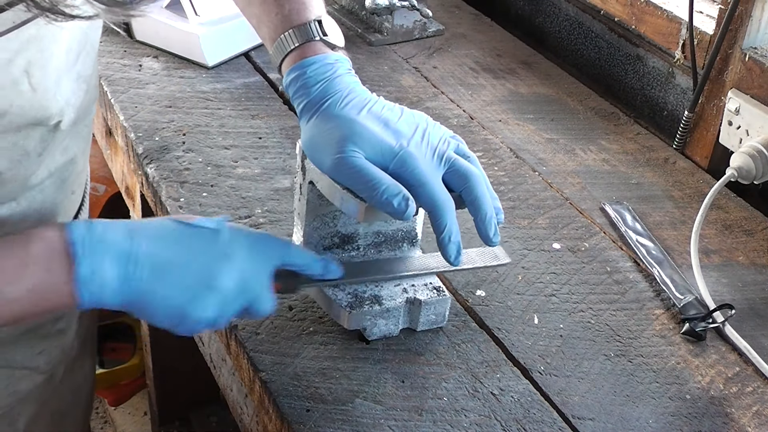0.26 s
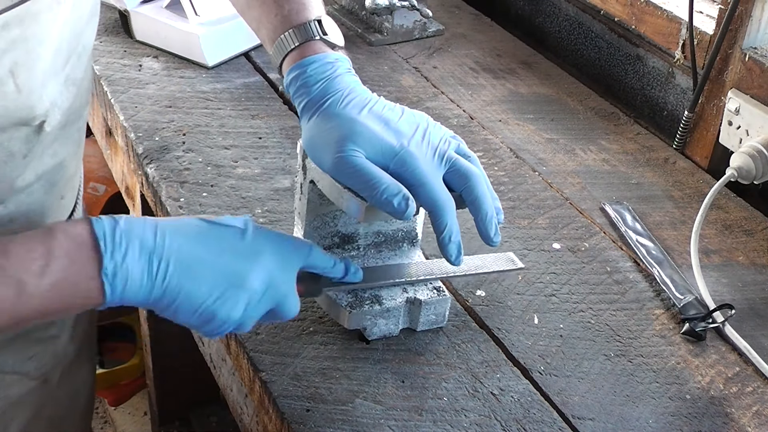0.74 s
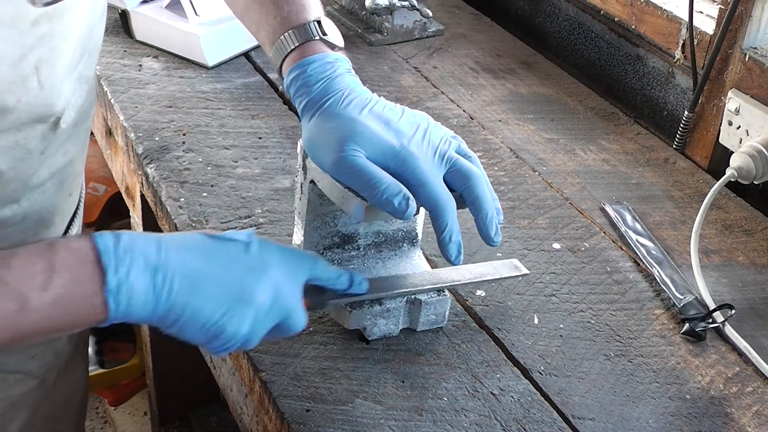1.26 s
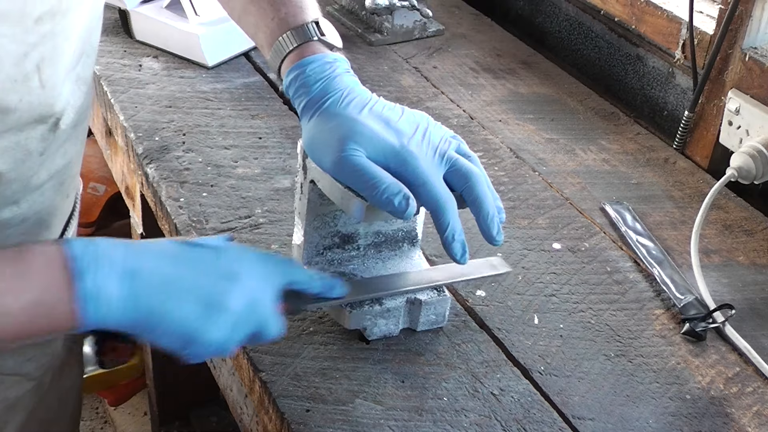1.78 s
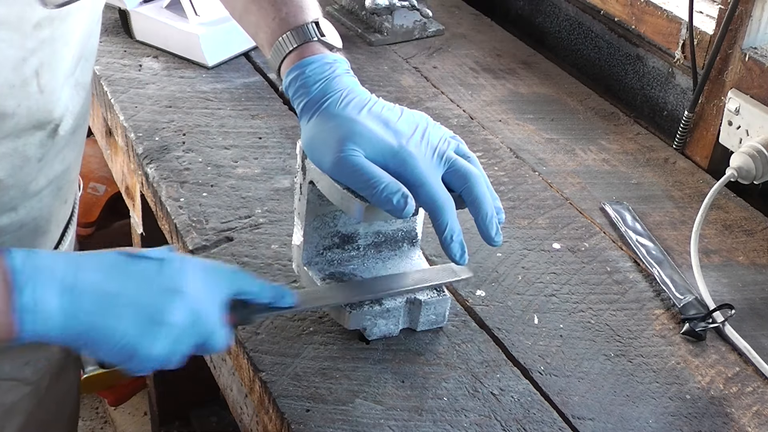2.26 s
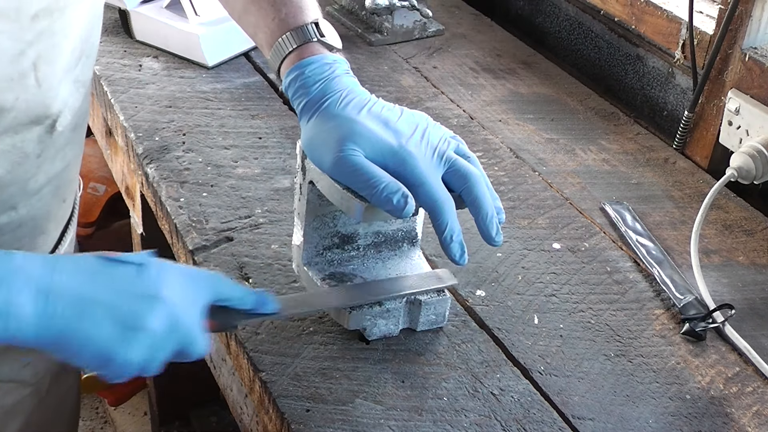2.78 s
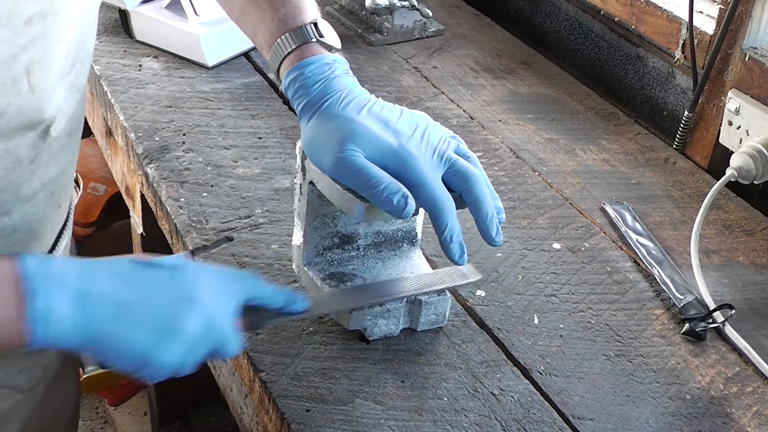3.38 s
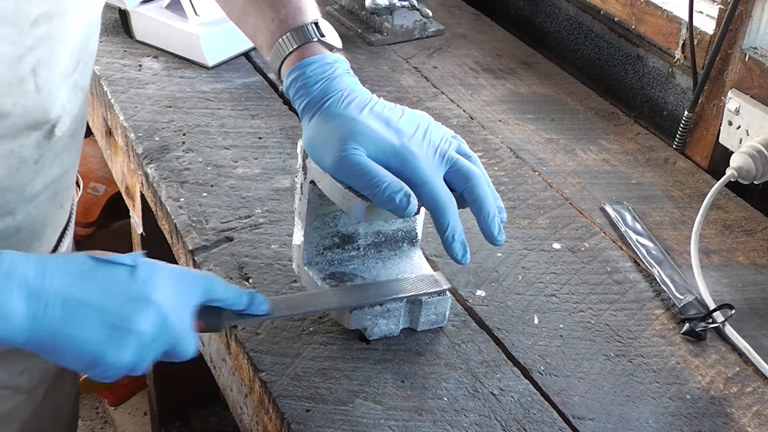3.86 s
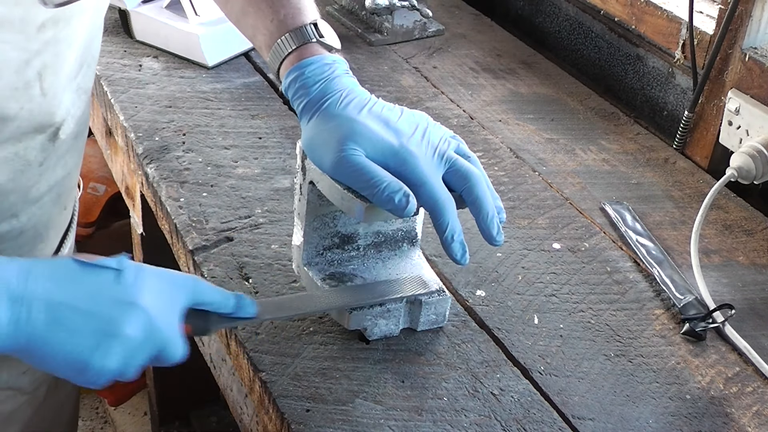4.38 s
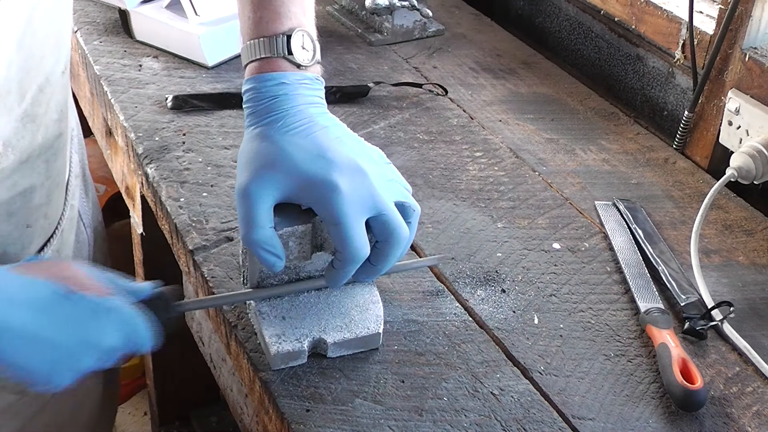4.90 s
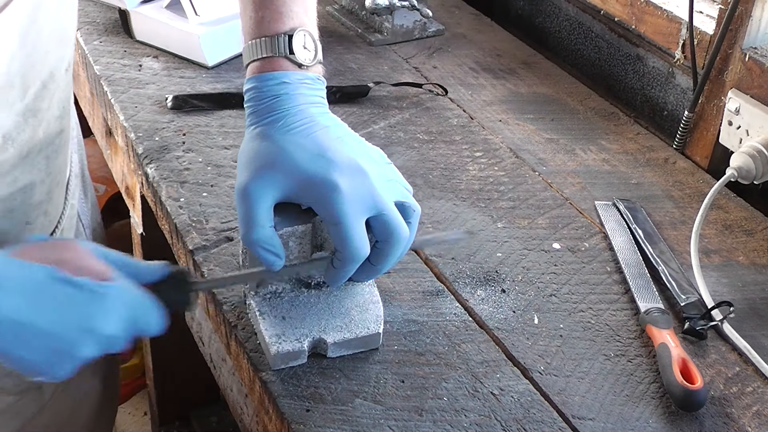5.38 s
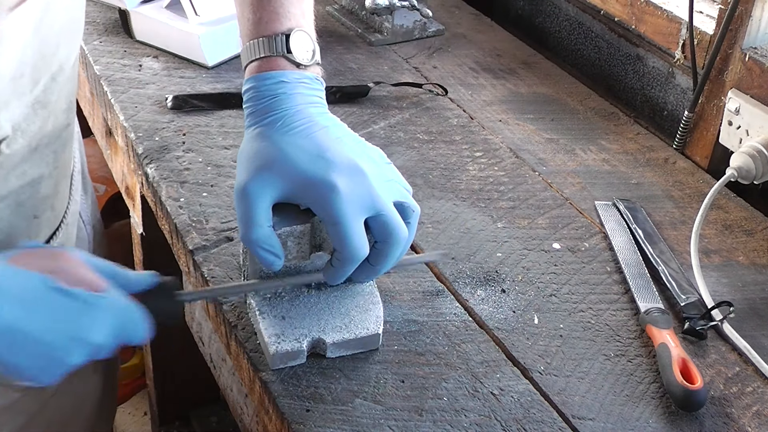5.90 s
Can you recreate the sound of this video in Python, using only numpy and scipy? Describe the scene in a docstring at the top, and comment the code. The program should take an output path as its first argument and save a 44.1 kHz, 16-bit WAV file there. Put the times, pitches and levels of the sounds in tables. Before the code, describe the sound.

Nine gritty strokes of a flat file on cast metal, then three with a slimmer file, rattling a wooden bench in a quiet workshop.

```python
"""Hand filing at a workbench

A hand file rasps over a metal casting on a wooden bench: nine strokes of a flat file, then three of a slimmer one.
Random tooth catches drive filters for the hissing steel, the chattering blade and the drumming bench.
Most strokes land with a click; light ticks, stick-slip squawks and brief singing come between and on top.
The workshop is small and quiet, with a low rumble and a hum under the slim file; the microphone is close."""
import sys
import numpy as np
from scipy import signal
from scipy.fft import rfft, irfft, next_fast_len
from scipy.io import wavfile
from scipy.ndimage import uniform_filter1d, map_coordinates

SR = 44100
rng = np.random.default_rng(int(sys.argv[2]) if len(sys.argv) > 2 else 0)


def to_wav(s):
    """Save 16-bit WAV."""
    ch = np.atleast_2d(s).T  # columns
    pcm = np.round(np.clip(ch, -1, 1) * 32767)  # PCM
    wavfile.write(sys.argv[1], SR, pcm.astype(np.int16))


N = 270774  # samples

# Levels in the tables are balances ahead of the mix trims set in scene().

# strokes: touch_s, bite_s (full bite), rise_s, hold_s, release_s (time to fall by LIGHT_DB), hiss_db,
# gained_db (effort gained over the hold), chatter_db and judder_db (blade and bench above the hiss),
# lean_db (judder gained over the hold), top_db (top of the hiss against the rest)
FLAT_STROKES = [ (0, 0.06, 0.065, 0.14, 0.092, -29, 5, 2.7, 5.5, -2.5, 5),
                (0.54, 0.69, 0.12, 0.083, 0.11, -33.5, -1, 2.9, -3.5, -15, 2),
                (1.064, 1.184, 0.051, 0.099, 0.098, -25.5, 1, 6, 5.5, 0, -4),
                (1.618, 1.747, 0.086, 0.14, 0.07, -23.5, -1.9, 4, -1, -9, 0.5),
                (2.141, 2.298, 0.098, 0.12, 0.093, -26, 3, 6.9, 4, -3.5, -2),
                (2.758, 2.838, 0.086, 0.13, 0.093, -25, -1.5, 4.5, -0.5, -2.5, 0),
                (3.234, 3.335, 0.031, 0.22, 0.082, -28.5, 2.6, 6.3, 4.5, -7.5, -3),
                (3.814, 3.955, 0.1, 0.13, 0.091, -23, -11.5, 3.3, -1, -4, -6),
                (4.367, 4.485, 0.1, .13, 0.072, -21.5, -10, 3.1, -3.5, -11.5, -0.5), ]
SLIM_STROKES = [ (4.856, 5.081, 0.054, 0.22, 0.088, -29.5, -7, 5.4, 6.6, 10.5, 0),
                (5.59, 5.705, 0.12, 0.093, 0.11, -29.5, -3, 5.9, 6.7, 5.9, 0),
                (6.048, 6.052, 0.0024, 0.04, 0.11, -31.5, -1, 3.3, 1.1, 2.7, 0), ]
# the file lands or snags: start_s, click_db, weight_db (how much more it shakes blade and bench)
FLAT_KNOCKS = [(0.5397, -5.5, -23.5), (1.064, -13, 4), (1.1707, -14.5, 3.5), (1.6182, -8.5, -12),
               (2.141, -9, -6.5), (2.7579, -18.5, -4.5), (2.824, -12.5, -13), (3.2343, -12.5, -2),
               (3.3278, -11.5, -23), (3.8135, -9.5, -9), (4.3665, -15.5, 0.5)]
SLIM_KNOCKS = [(5.5904, -18.5, 4.5), (5.6044, -14, -6), (6.0484, -13.5, -4.5)]
# light ticks as the slim file is set in place: start_s, level_db, pitch_hz
TICKS = [(4.855, -41, 4370), (4.8837, -35, 8900), (4.893, -26.5, 1870), (4.904, -13, 10700),
         (4.9517, -14.5, 5450), (4.9836, -35, 4330)]
# the flat file brushes the casting again as it turns: centre_s, spread_s (standard deviation), hiss_db
SCUFFS = [(0.308, 0.011, -40.5), (1.411, 0.0044, -38.5), (2.174, 0.0056, -35), (3.265, 0.016, -34.5),
          (4.084, 0.0079, -27)]
# file and casting stick and slip in step, squawking or rocking: centre_s, spread_s, pitch_hz, level_db
SQUAWKS = [(0.254, 0.022, 138, -23), (0.855, 0.0069, 189.6, -27.5), (2.345, 0.0042, 496.7, -15),
           (2.407, 0.013, 125, -24.5), (3.429, 0.0077, 538, -13), (3.948, 0.008, 542, -12),
           (3.974, 0.015, 665, -14), (3.985, 0.013, 550, -13.5), (5.072, 0.02, 174.7, -17.5),
           (5.228, 0.022, 178, -15.5), (5.285, 0.016, 555, -18), (5.725, 0.0047, 737, -16)]
# the flat blade is bowed into singing: centre_s, spread_s, pitch_hz, level_db
SINGING = [(1.25, 0.016, 4325, -23.5), (1.43, 0.039, 4335, -59)]

# resonances of steel, bending blade and bench: centre_hz, width_hz, height_db (over the broad colour,
# before the moving contact shifts it)
FLAT_RING = [(2420, 14, 11), (3285, 55, 10.5), (4335, 16, 19.5), (4340, 160, 7), (6700, 250, 5),
             (8690, 260, 8), (9465, 10, 13.5), (10574, 12, 17.5), (11030, 180, 15), (13620, 280, 12)]
SLIM_RING = [(2432, 14, 13), (4330, 200, 5.5), (6700, 8, 14), (7950, 14, 9), (8220, 13, 14.5),
             (8690, 12, 9), (11480, 20, 9), (13530, 14, 11), (14830, 14, 10)]
FLAT_BEND = [(1085.5, 19, 14), (1105.6, 40, 16.6), (1180, 18, 11), (1300, 24, 2.1), (1395, 13, 13)]
SLIM_BEND = [(1033, 37, 4.3), (1185, 18, 3.5), (1398, 26, 10.7)]
FLAT_BENCH = [(142.5, 16, 6.9), (174, 26, 13.4), (225.6, 28.7, 15.8), (379, 61, 9.6), (456, 44, 11.5),
              (534.5, 35, 11.9), (641, 12, 10.2), (837, 19, 4.5)]
SLIM_BENCH = [(183, 29, 11), (234, 22, 10.5), (346, 43, 11.3), (427, 11, 11.4), (455, 51, 5.5),
              (559, 20, 9.9), (725, 22, 7.3)]
# broad colours of the hissing steel, the blade, the bench and the room rumble: freq_hz, level_db (relative)
FLAT_HISS = [(1200, -29), (2000, -3), (2700, -8), (5000, -0.5), (6400, 1.5), (8000, 2), (11400, 2),
             (12100, -9), (14500, -4.5), (16000, -11.5)]
SLIM_HISS = [(1200, -24), (2000, -13), (2700, -7), (4000, -1), (7500, -3), (10500, 1), (12100, -10.5),
             (16000, -13.5)]
BLADE = [(500, -27), (850, -3), (1050, 9), (1400, 8.5), (2300, -9), (2800, -20.5), (5000, -62)]
BENCH = [(30, -30), (70, -3), (200, -2), (290, -1.5), (600, 0), (900, -5.5), (1200, -40.5), (2200, -46)]
RUMBLE = [(25, -5), (80, -1), (180, -6), (560, -18.5), (700, -21), (1200, -21.5), (2100, -39.5),
          (2500, -52), (6500, -47), (16000, -59)]

# the two microphone ports, direct sound: freq_hz, tilt_db (left minus right)
TILT = [(2000, 0), (7500, 1.5), (11000, -3), (13500, 0.5)]
# the same ports: freq_hz, lead_rad (left ahead of right)
LEAD = [(8000, 0), (12000, 0.99), (12800, 1.5), (14600, 0.78)]
# stereo spread of room and background: freq_hz, width_db (side minus mid)
WIDTH = [(30, -3), (120, -20), (1000, -11.5), (4000, -9), (12000, -2.5)]
# decay of the workshop: freq_hz, t60_s
WORKSHOP = [(150, 0.37), (1000, 0.23), (5000, 0.22), (14000, 0.017)]

LIGHT_DB = 26  # a stroke rises from, and is released to, a light touch this far below full bite
ARCH_DB = 2  # the hand is fastest in mid-stroke
TOP_HISS_HZ = 12500  # the angle of the file changes the hiss around and above this
ROCK_DB, ROCK_T60_S = -33, 0.81  # the casting rocks on the bench under every stroke, then settles
SCUFF_CHATTER_DB = 5.5  # blade chatter over the hiss of a scuff
FREE_RING_DB = 2.5  # after a blow the steel rings more freely than under the rubbing teeth
TOP_HZ = 15900  # upper band limit


def filing(strokes, knocks, scuffs, hiss_colour, ring, bend, bench_modes, teeth_rate, rough_db,
           chatter_power, judder_power, heave_db, hiss_db, chatter_db, judder_db, click_db, clank_db, thud_db):
    """One file at work: its teeth excite the steel's high ring, the blade's bending and the bench below."""
    cut, top, chatter, judder = pressures(strokes, chatter_power, judder_power, heave_db)
    scuff = sum(amp(db) * swell(s, spread) for s, spread, db in scuffs)
    cut, top = np.hypot(cut, scuff), np.hypot(top, scuff)
    chatter = np.hypot(chatter, amp(SCUFF_CHATTER_DB) * scuff)
    click, clank, thud = blows(knocks, skids=[(0.041, 2.8), (.09, 4.5), (0.12, 3)])

    speed = np.sqrt(cut / cut.max())  # a faster stroke is louder and meets more teeth
    grip = amp(rough_db * unit(wobble(70) + wobble(260)))  # the file bites and skates on the rough casting
    teeth = unit(grip * catches(teeth_rate * (speed + 0.17), spread_db=5.5))
    # the heavy parts follow the bite only partly
    slips = unit(np.sqrt(grip) * catches(6000 * (speed + .3), spread_db=1.5))

    top_change = filtered((top - cut) * teeth, lambda hz: np.clip((hz - TOP_HISS_HZ) / 1000 + .5, 0, 1))
    rasp = cut * teeth + top_change
    steel = sliding(amp(hiss_db) * rasp, hiss_colour, ring, shift_db=5.0)
    free_ring = [(hz, width, db + FREE_RING_DB) for hz, width, db in ring]
    landing = resonate(amp(click_db) * click, hiss_colour, free_ring)
    blade_force = amp(chatter_db) * chatter * slips + amp(clank_db) * clank
    blade = sliding(blade_force, BLADE, bend, shift_db=-0.5)
    bench_force = amp(judder_db) * judder * slips + amp(thud_db) * thud
    bench = sliding(bench_force, BENCH, bench_modes, shift_db=2.5)
    return steel + landing + blade + bench


def pressures(strokes, chatter_power, judder_power, heave_db):
    """Gains of hiss, top hiss, chatter and judder as each stroke skims lightly, rises, holds and lets go."""
    t, gains = np.arange(N) / SR, np.zeros((4, N))
    for touch, bite, rise, hold, release, db, gained_db, chatter_db, judder_db, lean_db, top_db in strokes:
        skimming = np.clip((bite - t) / rise, 0, 1)
        after = np.maximum(t - bite - hold, 0)
        travel = np.clip((t - bite) / hold, 0, 1)
        arch = np.sin(np.pi * travel)
        effort = gained_db * travel + ARCH_DB * arch - LIGHT_DB * (skimming + after / release)
        hiss = amp(db + effort)
        # a power below 1 follows the effort less steeply, and so outlasts the hiss
        chatter = amp(db + chatter_db + chatter_power * effort)
        judder_shape_db = judder_power * effort + lean_db * (travel - .5) + heave_db * arch
        judder = amp(db + judder_db + judder_shape_db)
        rocking = (t >= bite) * amp(ROCK_DB - 60 * after / ROCK_T60_S)
        parts = np.array([hiss, hiss * amp(top_db), chatter, np.hypot(judder, rocking)])
        gains += (t >= touch) * parts
    return np.abs(uniform_filter1d(gains, size=200, axis=1))  # soften the touch-down edges


def catches(rate, spread_db):
    """Teeth catch and break free at random, rate a second, each with its own force."""
    chance = np.clip(rate / SR, 1e-4, 1)
    caught = rng.random(N) < chance
    force = rng.choice([-1, 1], N) * amp(spread_db * rng.standard_normal(N))
    return unit(caught * force / np.sqrt(chance))  # even power whatever the rate


def blows(knocks, skids):
    """Click, blade and bench forces of each knock: a sharp contact plus a skid (t60_s, energy_db) in each."""
    t, force = np.arange(SR // 8) / SR, np.zeros((3, N + SR))
    for s, db, weight_db in knocks:
        levels_db = (db, db + weight_db, db + weight_db)
        for part, level_db, (skid_s, skid_db) in zip(force, levels_db, skids):
            skid = rng.standard_normal(len(t)) * amp(-60 * t / skid_s)
            contact = amp(skid_db) * skid / np.linalg.norm(skid) + (t == 0)
            part[round(s * SR):][:len(t)] += amp(level_db) * contact
    return force[:, :N]


def sliding(force, colour, modes, shift_db, count=3):
    """As the contact travels along the blade it favours different resonances from moment to moment."""
    shares = np.array([np.exp(wobble(12)) for _ in range(count)])
    shares /= np.linalg.norm(shares, axis=0)
    out = np.zeros(N)
    for place, share in enumerate(shares):
        # each resonance has its own pattern of nodes along the blade
        here = [(hz, width, db + shift_db * np.cos(2 * np.pi * (place + k) / count))
                for k, (hz, width, db) in enumerate(modes)]
        out += resonate(force * share ** 2, colour, here)
    return out


def resonate(force, colour, modes):
    """A force through a causal body of energy 1: a broad colour with resonances standing on it."""
    hz = np.fft.rfftfreq(SR, 1 / SR)
    peaks = sum(amp(2 * db) / (1 + (2 * (hz - centre) / width) ** 2) for centre, width, db in modes)
    # fold the cepstrum forward for minimum phase, so nothing rings before the blow
    cepstrum = irfft(np.log(amp(along(colour, hz)) * np.sqrt(1 + peaks)))
    cepstrum[1:SR // 2] *= 2
    cepstrum[SR // 2:] = 0
    ring = irfft(np.exp(rfft(cepstrum)))[:SR // 2]
    return signal.fftconvolve(force, ring / np.linalg.norm(ring))[:N]


def squawks(rows, waver, octave_db):
    """Brief wavering stick-slip tones, each with its octave."""
    out, drift = np.zeros(N), 1 + waver * wobble(150)
    for s, spread, hz, db in rows:
        phase = 2 * np.pi * hz * np.cumsum(drift) / SR
        tone = np.sin(phase) + amp(octave_db) * np.sin(2 * phase)
        out += amp(db) * swell(s, spread) * tone
    return out


def ticks(tail_s, tail_db, level_db):
    """The file's edge taps the casting, too lightly to shake the bench: an impulse and a noise tail, ringing."""
    t, out = np.arange(N) / SR, np.zeros(N)
    colour = [(200, 21.5), (1500, -4.5), (5000, -2.5), (16000, 8)]  # freq_hz, level_db
    for s, db, hz in TICKS:
        start = round(s * SR)
        age = t - start / SR
        force = amp(tail_db - 60 * np.abs(age) / tail_s) * rng.standard_normal(N) * (age >= 0)
        force[start] = 1
        out += amp(db + level_db) * resonate(force, colour, [(hz, hz / 4, 14)])
    return out


def workshop(x):
    """The room's short answer: 5 ms late, a noise tail dying faster in the treble."""
    hz, t, z = signal.stft(rng.standard_normal((2, SR // 2)), SR, nperseg=256)
    decay = amp(-60 * t / along(WORKSHOP, hz)[:, None])
    tail = signal.istft(z * decay, SR, nperseg=256)[1]
    tail /= np.linalg.norm(tail[0])
    late = np.pad(x, (SR // 200, 0))[None]
    return ports(*signal.fftconvolve(late, tail, axes=1)[:, :N])


def background(level_db, hum_db, hum_hz):
    """A low room rumble with a trace of hiss; a deep, fuzzy hum joins it with the slim file."""
    air = filtered(rng.standard_normal((2, N)), lambda hz: amp(along(RUMBLE, hz)))
    hum = unit(filtered(rng.standard_normal(N), lambda hz: 1 / (1 + ((hz - hum_hz) / 8) ** 2)))
    hum_on = np.arange(N) / SR > TICKS[0][0]
    return amp(level_db) * unit(ports(*air)) + amp(hum_db) * hum * hum_on


def ports(mid, side):
    """Left and right of a diffuse sound: most alike in the upper bass, furthest apart in the high treble."""
    side = filtered(side, lambda hz: amp(along(WIDTH, hz)))
    return np.array([mid + side, mid - side])


def amp(db):
    """Decibels to gain."""
    return 10 ** (np.asarray(db) / 20)


def unit(x):
    """x at rms 1."""
    return x / np.sqrt(np.mean(x ** 2) + 1e-20)


def along(points, hz):
    """(freq_hz, value) points read on a log axis."""
    f, v = np.transpose(points)
    return np.interp(np.log(hz + 1), np.log(f + 1), v)


def wobble(rate):
    """A smooth random curve, rate knots a second."""
    knots = rng.standard_normal(int(N * rate / SR) + 4)
    return map_coordinates(knots, [np.arange(N) * rate / SR])


def swell(s, spread):
    """A bell-shaped gain in time, spread being its standard deviation in seconds."""
    return np.exp(-((np.arange(N) / SR - s) / spread) ** 2 / 2)


def filtered(x, response):
    """x times a response of frequency."""
    m = next_fast_len(N + SR // 2)
    return irfft(rfft(x, m) * response(np.fft.rfftfreq(m, 1 / SR)), m)[..., :N]


def scene():
    """Both files close to the microphone, in the room."""
    flat = filing(FLAT_STROKES, FLAT_KNOCKS, SCUFFS, FLAT_HISS, FLAT_RING, FLAT_BEND, FLAT_BENCH,
                  teeth_rate=12000, rough_db=2, chatter_power=0.81, judder_power=0.53, heave_db=1.0,
                  hiss_db=0, chatter_db=-0.5, judder_db=-0.5, click_db=7.0, clank_db=16.0, thud_db=11)
    slim = filing(SLIM_STROKES, SLIM_KNOCKS, [], SLIM_HISS, SLIM_RING, SLIM_BEND, SLIM_BENCH,
                  teeth_rate=18000, rough_db=2.3, chatter_power=1.0, judder_power=0.63, heave_db=2.5,
                  hiss_db=-1, chatter_db=-1, judder_db=2, click_db=6.0, clank_db=16.5, thud_db=15.5)
    tones = squawks(SQUAWKS, waver=0.0356, octave_db=-1) + squawks(SINGING, waver=0.0029, octave_db=-8.5)
    work = flat + slim + tones + ticks(tail_s=0.091, tail_db=-29.0, level_db=13.5)
    sides = np.array([[1], [-1]]) / 2  # half the difference to each port
    direct = filtered(work, lambda hz: amp(sides * along(TILT, hz)) * np.exp(1j * sides * along(LEAD, hz)))
    return direct + amp(-12.5) * workshop(work) + background(level_db=-39.5, hum_db=-41, hum_hz=53.0)


def record(dry):
    """Round off the tallest peaks towards 0.85 of full scale, then cut steeply above the band limit."""
    rounded = dry / (1 + np.abs(dry / .85) ** 6) ** (1 / 6)
    return filtered(rounded, lambda hz: 1 / (1 + (hz / TOP_HZ) ** 160))


dry = scene()
out = record(dry)
to_wav(out)
```